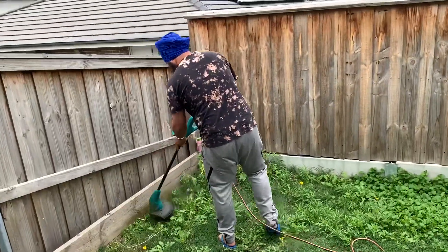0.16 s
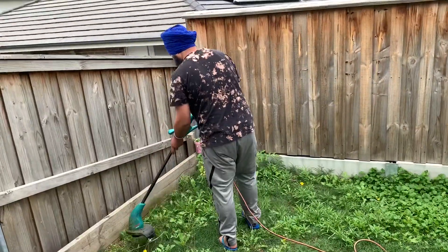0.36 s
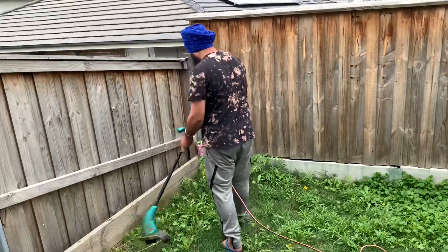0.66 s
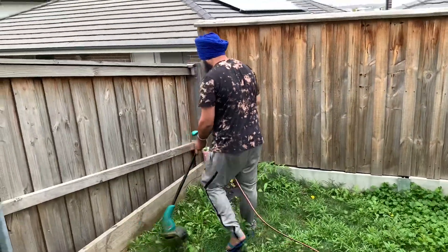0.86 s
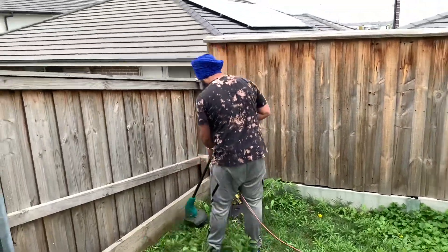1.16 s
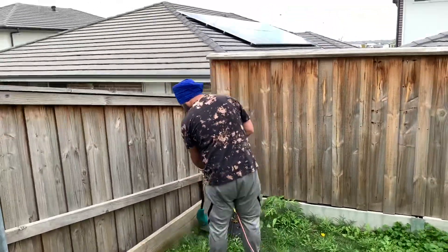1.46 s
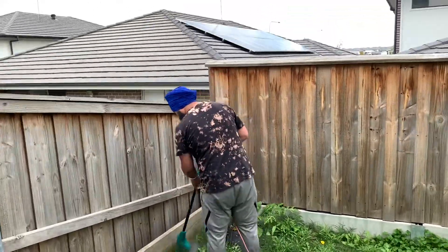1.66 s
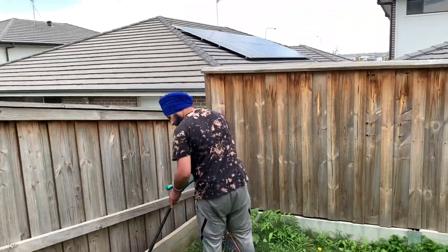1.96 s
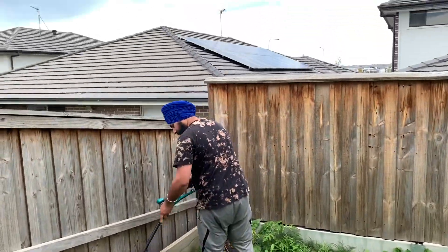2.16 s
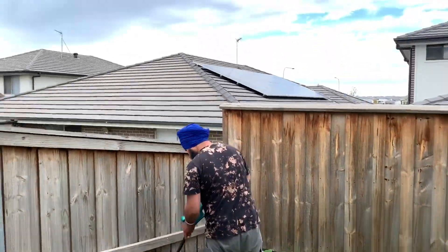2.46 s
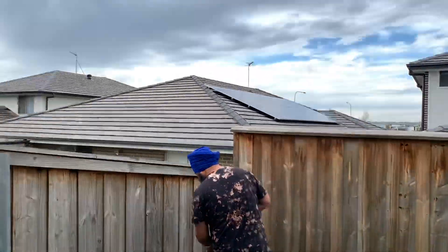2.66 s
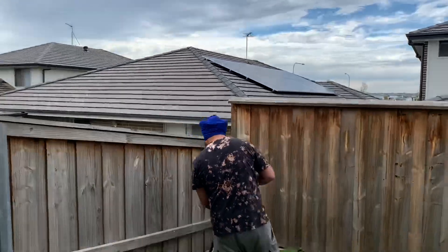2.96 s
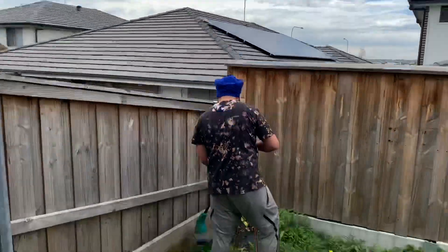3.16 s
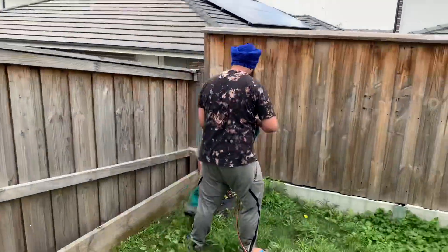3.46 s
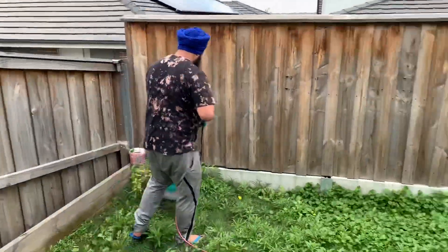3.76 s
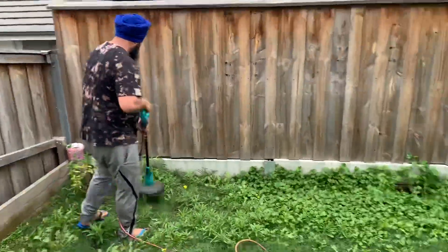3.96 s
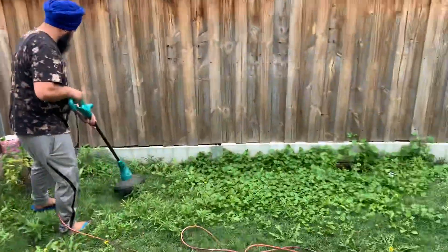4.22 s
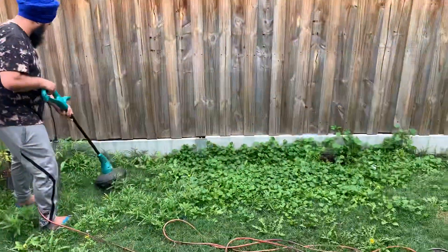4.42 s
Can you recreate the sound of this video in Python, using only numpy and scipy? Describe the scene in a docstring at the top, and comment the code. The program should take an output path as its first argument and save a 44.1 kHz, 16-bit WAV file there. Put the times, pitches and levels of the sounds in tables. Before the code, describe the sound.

Close electric grass trimmer whirrs, sags and revs again, its spinning line slashing weeds and cracking against stems over faint distant traffic.

```python
"""A corded string trimmer in a fenced yard, over distant traffic and a faint drone.
0-1 s: near full speed to about 0.3 s, then coasting down; the head hums, the line whistles and slashes grass.
1-2.6 s: it spins up, sags at about 1.85 s and recovers; loaded passes bring chop, strikes and a choked whistle.
2.6-4.3 s: it coasts down in light work, then spins up again to the end.
Hum is a sum of shaft orders, the rest mostly shaped noise; stereo phase varies with frequency and peaks clip."""
import sys
import numpy as np
from scipy import signal
from scipy.fft import rfft, irfft, next_fast_len
from scipy.io import wavfile
from scipy.ndimage import map_coordinates

SR = 44100
rng = np.random.default_rng(int(sys.argv[2]) if len(sys.argv) > 2 else 0)


def store_wav(level_fs):
    """Save 16-bit WAV to argv[1]."""
    pcm = np.round(np.clip(np.atleast_2d(level_fs), -1, 1) * 32767)
    wavfile.write(sys.argv[1], SR, pcm.T.astype(np.int16))


def elevation(decibels):
    """Turn decibel levels (scalar or array-like) into linear amplitude ratios."""
    levels = np.asarray(decibels, float)
    return 10 ** (levels / 20)


N = 202379


def unit(x):
    """Scaled to rms 1."""
    return x / np.sqrt(np.mean(x ** 2) + 1e-20)


def along(points, x):
    """(x, value) points read on a log axis."""
    f, v = np.transpose(points)
    return np.interp(np.log(x + 1), np.log(f + 1), v)


def curves(rows):
    """One value per sample for each column after the time."""
    s, *cols = np.transpose(rows)
    return [np.interp(np.arange(N) / SR, s, c) for c in cols]


def wobble(knots_per_s):
    """A smooth random curve."""
    knots = rng.standard_normal(int(N * knots_per_s / SR) + 4)
    return map_coordinates(knots, [np.arange(N) * knots_per_s / SR])


def filtered(x, response):
    """x times a complex response of frequency."""
    m = next_fast_len(N + 8192)
    return irfft(rfft(x, m) * response(np.fft.rfftfreq(m, 1 / SR)), m)[..., :N]


def noise(spectrum):
    """Two unrelated coloured noises of rms 1: what left and right share and what they do not."""
    white = rng.standard_normal((2, N))
    return unit(filtered(white, lambda hz: elevation(along(spectrum, hz))))


def bursts(at, gains, decay_ms):
    """Envelope that jumps at the given samples and dies away exponentially."""
    kicks = np.bincount(at, gains, minlength=N)[:N]
    return signal.lfilter([1], [1, -np.exp(-1000 / (SR * decay_ms))], kicks)


def bells(rows):
    """Summed bell-shaped swells, as an amplitude."""
    t = np.arange(N) / SR
    return sum(elevation(db) * np.exp(-(2 * (t - s) / length_s) ** 2) for s, length_s, db in rows)


# shaft under trigger and load: (t/s, f/Hz in turns, first-order hum level/dB as the head tilts)
SHAFT_RUN = [(0.0, 186.2, -25.5), (0.13, 184.8, -30), (0.2, 189.7, -30.5), (0.27, 192.5, -21),
             (0.32, 189.6, -20.5), (0.38, 178.5, -21.5), (0.46, 162.8, -38), (0.5, 160.1, -21),
             (0.56, 147.1, -31.5), (0.65, 137.4, -33.5), (0.74, 127.1, -42), (0.84, 115.7, -33),
             (0.96, 104.4, -52), (1.05, 127.8, -24.5), (1.15, 150.6, -24.5), (1.32, 165.5, -20),
             (1.42, 168.2, -25.5), (1.5, 173.5, -24.5), (1.7, 157.3, -22), (1.78, 149.6, -30.5),
             (1.85, 146.7, -41), (1.9, 152.8, -39), (1.97, 166, -15), (2.02, 168.7, -27),
             (2.12, 177, -19.5), (2.21, 184.6, -20.5), (2.36, 189.1, -19), (2.47, 189.2, -25),
             (2.58, 177.1, -33), (2.67, 174.1, -20.5), (2.8, 177.2, -21), (2.86, 165, -31),
             (2.93, 154.5, -23.5), (2.99, 144.6, -29.5), (3.12, 128.8, -23), (3.22, 117.7, -29.5),
             (3.37, 103.8, -46), (3.51, 92.5, -32), (3.76, 73.73, -49), (3.96, 60, -39), (4.08, 52.97, -49),
             (4.32, 49.86, -46), (4.37, 65, -42), (4.45, 95.05, -40), (4.52, 116.3, -37),
             (4.59, 126.7, -30)]


def shaft():
    """Shaft speed in Hz and hum level in dB, per sample."""
    return curves(SHAFT_RUN)


# line at work: (t/s, facing the listener level/dB, load of stems level/dB)
LINE_WORK = [(0.0, -0.5, -29.5), (0.06, -2.5, -24.5), (0.14, -1, -29.5), (0.22, -2, -32), (0.28, -3, -30),
             (0.32, -3.5, -26), (0.47, 3.5, -29.5), (0.66, 3, -29.5), (0.78, 2, -31), (0.97, -2.5, -34),
             (1.1, 3, -29), (1.17, 4, -25), (1.36, 0.5, -21), (1.385, -2, -14.5), (1.46, -1, -25.5),
             (1.56, -1, -13.5), (1.6, -0.5, -16), (1.75, 7, -12), (1.8, 6.5, -12.5), (1.84, -1, -8.5),
             (1.9, 3, -26), (2.09, 7, -30), (2.13, 5.5, -27), (2.17, 7, -33), (2.2, 6.5, -30.5),
             (2.3, 5, -29), (2.38, 0.5, -25.5), (2.43, 2, -21.5), (2.52, -2.5, -19), (2.58, 3.5, -15.5),
             (2.6, -3, -19), (2.71, -3.5, -24), (2.82, 2.5, -33.5), (3.03, 1.5, -31), (3.17, -0.5, -34),
             (3.37, -1.5, -36), (3.48, 0.5, -33.5), (3.56, -3, -26), (3.62, -0.5, -34.5),
             (3.71, -1.5, -37.5), (4.0, 3.5, -50), (4.07, 6, -45), (4.13, -1, -38), (4.33, -14, -33),
             (4.39, -7, -26), (4.45, 0, -18), (4.49, 0, -22.5), (4.52, -1, -20.5), (4.59, -14, -20.5)]


def work():
    """Facing and load of the line in dB, per sample."""
    return curves(LINE_WORK)


MID_LOAD_DB = -30


def answer(full_db, doubling_db, facing, loading):
    """Level in dB: full_db at 185 Hz, then dB per speed doubling and shares of facing and load."""
    face_db, load_db = work()
    speed_db = doubling_db * np.log2(shaft()[0] / 185)
    return full_db + speed_db + facing * face_db + loading * (load_db - MID_LOAD_DB)


def choke():
    """Level change in dB of the free-flying tip as stems wrap the line: -11.2 per dB of load above -15.5."""
    return -11.2 * np.maximum(work()[1] + 15.5, 0)


# low traffic rumble before its wander: (t/s, level/dB)
RUMBLE_LEVEL = [(0.0, -48), (0.5, -42.5), (1.1, -38), (1.5, -37), (1.58, -36), (1.66, -34), (2.25, -36.5),
                (2.75, -42), (2.85, -47), (3.17, -45), (3.24, -40.5), (3.6, -45), (4.05, -55),
                (4.25, -46.5), (4.59, -38)]
# traffic hiss colour: (f/Hz, relative level/dB)
TRAFFIC_COLOUR = [(25, -37), (64, 1), (140, -0.5), (500, -14.5), (900, -21), (2500, -40), (5000, -35),
                  (7500, -30), (10000, -39), (16000, -55)]
# distant machine: (f/Hz, relative level/dB)
DRONE_TONES = [(296.1, -58.5), (371.4, -60.5), (479.1, -59)]


def traffic():
    """Far rumble and hiss as coloured noise, and a drone of steady-pitch, wavering sines."""
    t = np.arange(N) / SR
    rumble_colour = [(25, -59), (45, 6.5), (80, 5.5), (130, -3.5), (300, -19)]
    rumble = elevation(curves(RUMBLE_LEVEL)[0] + 1.7 * wobble(8.7)) * noise(rumble_colour)
    drone = sum(elevation(db + 3.5 + 1.9 * wobble(4.34)) * np.sin(2 * np.pi * hz * t)
                for hz, db in DRONE_TONES)
    return rumble + elevation(-45.5) * noise(TRAFFIC_COLOUR) + drone


# orders 2, 3, 4: (level/dB at 185 Hz, slope/dB per speed doubling, share of facing, share of load)
LOW_ORDER_RULES = [(-42.5, 4, 0.12, 0.35), (-45, 7.1, 0.1, 0.38), (-45.5, 13.23, 0.18, 0.22)]
# ground and fence echoes lift and cancel the low tones: (f/Hz, level/dB)
YARD_GAIN = [(60, -2), (120, -2.5), (150, 0.5), (160, -2.5), (167, -8.5), (175, -5), (190, 3.5), (250, -1),
             (400, -1), (765, -1)]
# overtone swells, one list for each of orders 2 to 10: (t/s, length/s, peak rms level/dB)
ORDER_SWELLS = [
    [(.06, 0.052, -52), (.28, 0.066, -37), (.38, 0.1, -31), (.49, 0.056, -36), (.74, 0.089, -34),
     (1.16, 0.2, -47), (1.53, 0.15, -30), (1.69, .16, -21.5), (1.83, .14, -29), (2.1, 0.21, -31.5),
     (2.6, 0.13, -28), (2.84, 0.19, -34.5), (3.13, 0.15, -39), (4.455, 0.061, -31), (4.525, 0.041, -28),
     (4.585, 0.053, -24.5)],
    [(.16, 0.19, -41), (.5, 0.027, -39), (1.16, 0.36, -47), (1.42, 0.049, -54), (1.78, 0.062, -32),
     (1.85, 0.14, -33.5), (2.12, 0.13, -31.5), (2.28, 0.17, -29.5), (2.46, 0.13, -31), (2.78, 0.13, -39.5),
     (2.93, 0.061, -39), (3.12, 0.064, -40), (4.48, 0.055, -36.5)],
    [(.27, 0.085, -30.5), (.44, 0.054, -40), (.64, 0.079, -41), (1.65, 0.16, -30), (1.84, 0.062, -27.5),
     (2.03, 0.18, -38.5), (2.28, 0.1, -32), (2.49, 0.053, -30.5), (2.7, 0.18, -34), (4.52, 0.049, -31)],
    [(.18, 0.056, -44), (.48, 0.057, -39), (1.7, .1, -37), (2.05, 0.27, -38), (2.4, 0.13, -36),
     (2.77, 0.068, -54), (4.45, 0.051, -33)],
    [(.37, 0.099, -42), (1.52, .16, -34.5), (1.81, 0.061, -35), (2.45, 0.28, -37), (2.78, 0.074, -31),
     (4.52, 0.054, -38)],
    [(.4, 0.076, -41), (.81, 0.063, -38.5), (1.77, 0.032, -35), (2.46, 0.091, -33)],
    [(.25, .2, -43), (2.2, .15, -41), (2.5, .08, -31), (4.52, .05, -37)],
    [(.27, 0.14, -48), (.62, 0.13, -46), (2.52, 0.062, -29), (2.78, 0.089, -43)],
    [(.3, 0.073, -40), (.5, .16, -47), (2.38, 0.066, -35.5), (2.51, 0.079, -26), (4.53, 0.051, -38)],
]


def swell(k):
    """Peak amplitude that order k gains in its swells."""
    return np.sqrt(2) * bells(ORDER_SWELLS[k - 2]) if 2 <= k < 2 + len(ORDER_SWELLS) else 0


def hum(turns):
    """The unbalanced head pushes air once a turn: shaft orders, the upper ones flickering."""
    speed_hz, first_db = shaft()
    orders_db = [first_db] + [answer(*rule) + 4.7 * wobble(15) for rule in LOW_ORDER_RULES]
    # phase wander in turns, grows with load and with the root of the order
    rough_turns = 0.011 * elevation(0.35 * (work()[1] - MID_LOAD_DB))
    upper_db = answer(full_db=-30, doubling_db=17, facing=0.58, loading=0.45)
    snap_db = answer(full_db=-34.5, doubling_db=28, facing=0.5, loading=0.87) + choke()

    def low_order(k, db):
        level = elevation(db + along(YARD_GAIN, k * speed_hz)) * np.sqrt(2) + swell(k)
        phase_turns = k * turns + np.sqrt(k) * rough_turns * wobble(45)
        return level * np.sin(2 * np.pi * phase_turns + k)

    def upper_order(k, db):
        level = elevation(db + 3 * wobble(7) + 2.2 * wobble(35)) + swell(k)
        phase_turns = k * turns + rng.random() + np.sqrt(k) * rough_turns * wobble(40)
        return level * np.sin(2 * np.pi * phase_turns)

    low = sum(low_order(k, db) for k, db in enumerate(orders_db, 1))
    high = sum(upper_order(k, upper_db - 13.5 - 0.21 * (k - 5)) for k in range(5, 12))
    # the sharp snap of the line tip reaches far up the series
    snap = sum(upper_order(k, snap_db - 10 - 0.1 * (k - 12)) for k in range(12, 28))
    tone = low + high + snap
    return np.array([tone, np.roll(tone, 311)])  # the unshared part arrives by another path


# vortex whistle colour at 130 Hz shaft speed: (f/multiple of shaft speed, relative level/dB)
WHISTLE_COLOUR = [(12, -41.5), (27, -21.5), (34, -1), (40, 6), (46, 8), (55, 8.5), (68, -3.5), (100, -55),
                  (200, -60)]


def whistle(turns):
    """Vortices leave the line at a rate set by its speed, loudest as the tip sweeps toward the listener."""
    level_db = answer(full_db=-20, doubling_db=17, facing=1, loading=0.1633) + choke()
    hz, t, z = signal.stft(rng.standard_normal((2, N)), SR, nperseg=512)
    speed_hz = np.interp(t, np.arange(N) / SR, shaft()[0])
    # a slower tip smears the pitch less: a narrower band
    shape_db = along(WHISTLE_COLOUR, hz[:, None] / speed_hz) * (130 / speed_hz) ** 0.38
    shape = elevation(shape_db)
    even = z * shape / np.sqrt(np.mean(shape ** 2, 0))
    air = signal.istft(even, SR, nperseg=512)[1][:, :N]
    sweep = unit(elevation(2.1 * np.cos(2 * np.pi * turns - 1.2) + 1.17 * wobble(40)))
    return elevation(level_db) * sweep * unit(air)


# bites into thick tufts: (t/s, length/s, peak level/dB before the slash envelope)
TUFT_BITES = [(.06, 0.098, -21.5), (.28, 0.047, -41), (.45, .1, -44), (1.1, .06, -33), (1.34, 0.094, -22.5),
              (1.46, 0.077, -21), (1.56, 0.14, -24), (1.7, 0.099, -17.5), (1.76, 0.042, -22),
              (1.84, 0.052, -15.5), (2.08, 0.079, -23), (2.17, .05, -22), (2.3, 0.085, -31),
              (2.43, 0.042, -17), (2.55, 0.065, -17.5), (2.67, 0.1, -21), (4.45, 0.054, -25.5),
              (4.5, 0.038, -24.5), (4.57, 0.031, -19.5)]
# slash colour: (f/Hz, relative level/dB)
SLASH_COLOUR = [(200, -49), (800, -14.5), (2500, -9.5), (5000, -5.5), (8000, 6), (11000, 6), (13500, 3.5),
                (15000, -4.5), (16500, -3.5)]


def cutting(turns):
    """Each turn the line slashes blades of uneven toughness; loose bits crackle between."""
    free = elevation(answer(full_db=-21, doubling_db=36, facing=1, loading=0.3163))
    loaded = elevation(answer(full_db=-31.5, doubling_db=7, facing=0.3, loading=0.77)) + bells(TUFT_BITES)
    at = np.flatnonzero(np.diff(np.floor(turns + 0.3)))
    jitter, toughness = rng.standard_normal((len(at), 2)).T
    slash_at = np.clip(at + (25 * jitter).astype(int), 0, N - 1)
    slash = bursts(slash_at, elevation(1.14 * toughness + 1.3 * wobble(12)[at]), decay_ms=2.8)
    bits = bursts(rng.integers(0, N, 2500), elevation(2.7 * rng.exponential(size=2500)), decay_ms=0.39)
    envelope = unit(unit(slash) + 0.19 * unit(bits) + 0.39)
    return np.hypot(free, loaded) * envelope * noise(SLASH_COLOUR)


# whirr colour: (f/Hz, relative level/dB)
WHIRR_COLOUR = [(60, -64), (150, -1), (300, -2.5), (700, -3.5), (1500, -5.5), (3000, -5.5), (6000, -20.5),
                (16500, -7)]


def whirr(turns):
    """Brushes, cooling air and the dull chop of stems on the guard: noise kicked unevenly once a turn."""
    at = np.flatnonzero(np.diff(np.floor(turns + 1.1)))
    chop = bursts(at, elevation(rng.uniform(-11, 11, len(at))), decay_ms=6.5)
    return elevation(work()[1] - 5) * unit(1.6 * unit(chop) + 1) * noise(WHIRR_COLOUR)


# line hits stems and boards: (t/s, relative level/dB, body level/dB added to it)
STRIKE_HITS = [(0.015, -11.5, -4), (0.6734, -3, -19), (1.3763, 0, -1.5), (1.382, -5, -27),
               (1.4125, -6, -25), (1.5642, -12, -23), (1.6844, -1, -27), (1.716, -6, -22),
               (1.8147, -6, 2.5), (1.84, -4, -23), (2.4204, -2.5, -1), (2.499, -5.5, 6), (2.5475, -2, -12),
               (2.5793, -15, -27), (2.8474, -23, -22), (3.5206, -15.5, -13), (3.5549, -25, -1),
               (4.072, -46, -3), (4.1124, -25, -20), (4.15, -34, -12), (4.1714, -47, -18),
               (4.1863, -24, -21), (4.2335, -36, 5), (4.2854, -30, -21), (4.3492, -28, -11),
               (4.3927, -17.5, -3), (4.4045, -16, -10), (4.4404, -8.5, -27), (4.4956, -6, -32),
               (4.575, 0.5, -30)]
# crack colour: (f/Hz, relative level/dB)
CRACK_COLOUR = [(1500, -39), (4000, -10), (7000, -3), (9000, 7.5), (12000, -9), (16500, -3)]


def strikes():
    """Tough stems and boards: a bright decaying noise crack over a duller body."""
    s, hit_db, body_db = np.transpose(STRIKE_HITS)
    at = np.round(s * SR).astype(int)
    body_colour = [(300, -68), (1100, 7.5), (1800, -7.5), (2700, 3.5), (4000, 3.5), (7000, 2)]
    crack = bursts(at, elevation(hit_db - 9), decay_ms=7.8) * noise(CRACK_COLOUR)
    body = bursts(at, elevation(hit_db + body_db - 7), decay_ms=10.6) * noise(body_colour)
    return crack + body


# fence echoes: (delay/ms, relative level/dB)
FENCE_ECHOES = [(2.9, -17.5), (7.3, -8.5), (11.9, -9), (17.1, -39)]


def fenced(x):
    """Adds delayed copies thrown back by the fence, 8 dB below their table levels."""
    echoes = sum(elevation(db) * np.roll(x, round(ms * SR / 1000), axis=1) for ms, db in FENCE_ECHOES)
    return x + echoes * elevation(-8)


# stereo image by frequency: (f/Hz, likeness/0-1, left-right phase/rad, left-right level/dB)
STEREO_IMAGE = [(0, .95, -.1, -.7), (200, .96, -.15, 1), (450, .9, -.1, .5), (700, .75, .8, -2.5),
                (1500, .75, .7, -1), (2600, .6, 3.1, -1), (3500, .6, 3.6, -1), (4400, .3, 6.3, -1),
                (5600, .2, 6.3, 0), (6800, .6, 6.1, 0), (8350, .998, 3.14, 0), (8950, .998, 3.14, 0),
                (9700, .7, 1.6, 0), (10400, .998, 0, 0), (11700, .998, 0, 0), (12300, .6, -1.6, 0),
                (12900, .998, -3.14, 0), (14150, .998, -3.14, 0), (14550, .5, -5.3, 0),
                (15100, .998, -6.28, 0)]


def stereo(pair):
    """Mixes shared and unshared parts to the likeness, phase and tilt between left and right."""
    f, alike, phase_rad, tilt_db = np.transpose(STEREO_IMAGE)

    def channel(side):
        def response(hz):
            share = np.arccos(np.clip(np.interp(hz, f, alike), 0, 1)) / 2
            gain = elevation(side * np.interp(hz, f, tilt_db) / 2)
            turned = gain * np.exp(0.5j * side * np.interp(hz, f, phase_rad))
            return turned * [np.cos(share), side * np.sin(share)]
        return response

    return np.array([filtered(pair, channel(side)).sum(0) for side in (1, -1)])


def scene():
    """All sources, the noisy trimmer parts with fence echoes, spread over left and right."""
    turns = np.cumsum(shaft()[0]) / SR
    far = traffic()
    tones = hum(turns)
    hiss = whistle(turns) + cutting(turns) + whirr(turns) + strikes()
    return stereo(far + tones + fenced(hiss))


def band_limit(x):
    """A steep low-pass at the top of the band."""
    return signal.sosfilt(signal.butter(12, 16510, fs=SR, output="sos"), x)


def record(dry):
    """Low-passed at 15850 Hz, then peaks clip at full scale."""
    limited = filtered(dry, lambda hz: hz < 15850)
    mix = np.clip(limited, -1, 1)
    return band_limit(mix)


dry = scene()
out = record(dry)
store_wav(out)
```